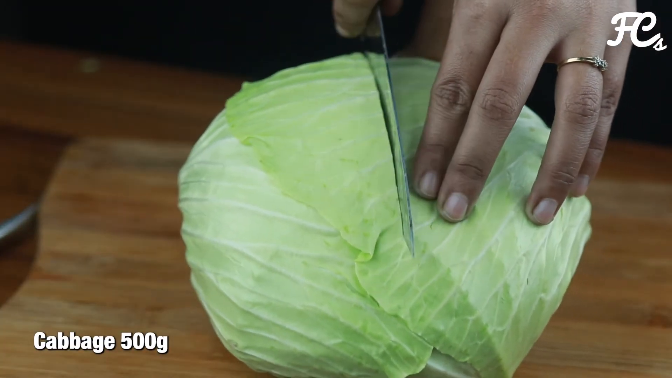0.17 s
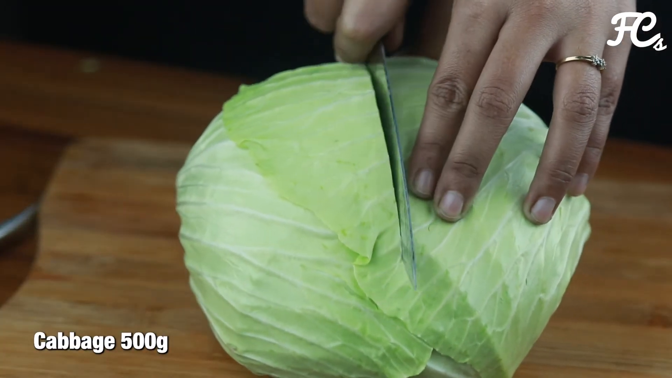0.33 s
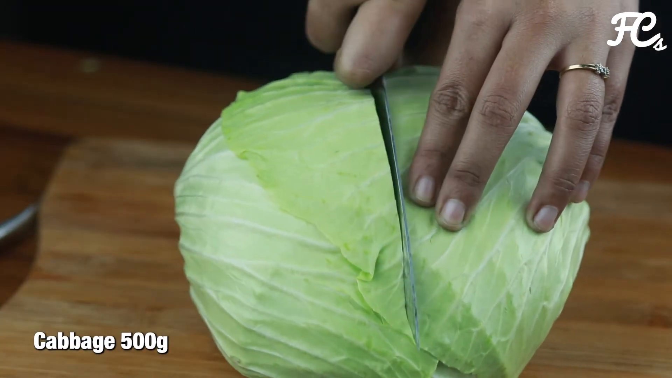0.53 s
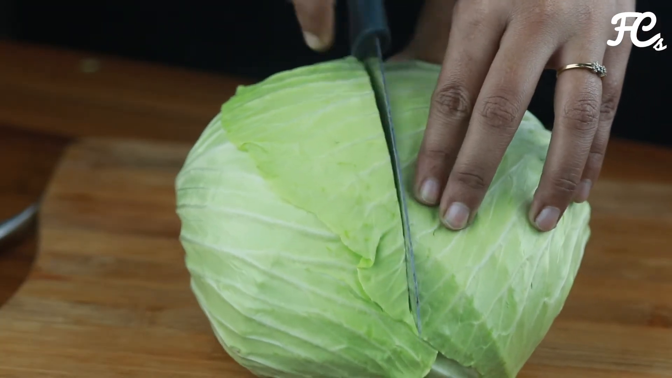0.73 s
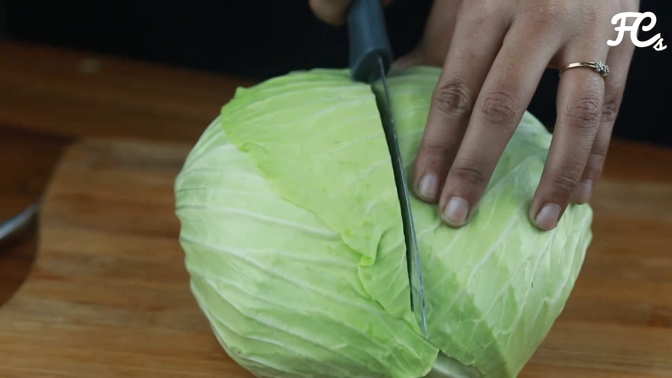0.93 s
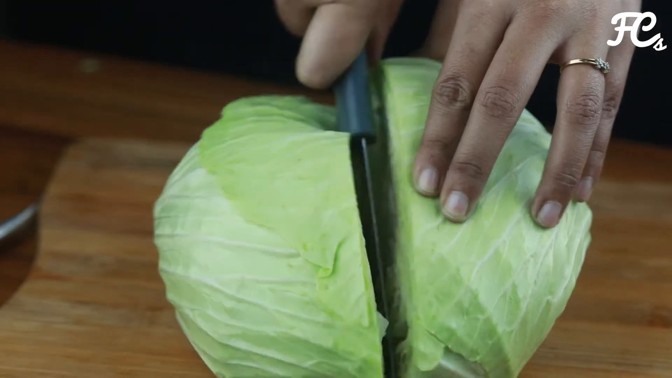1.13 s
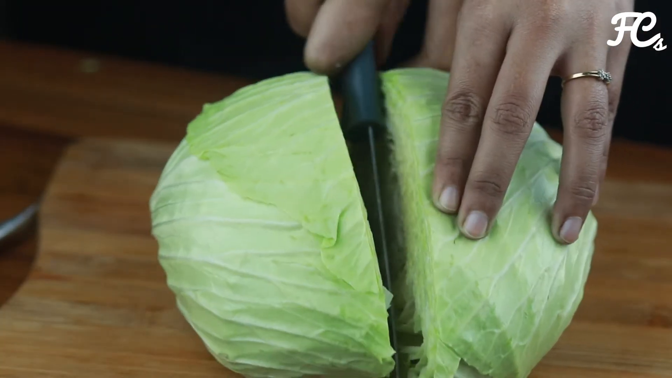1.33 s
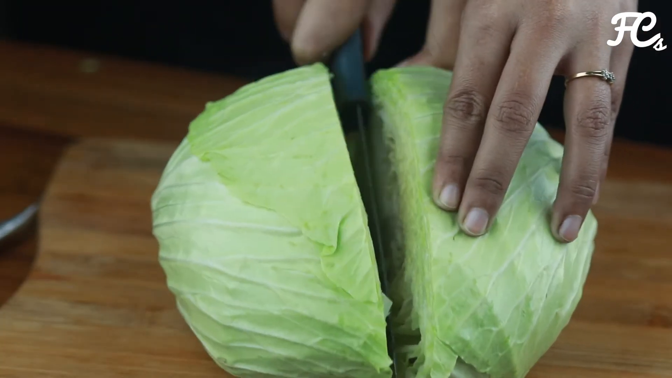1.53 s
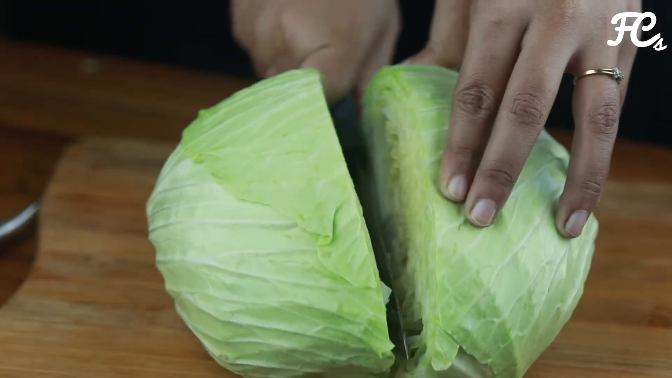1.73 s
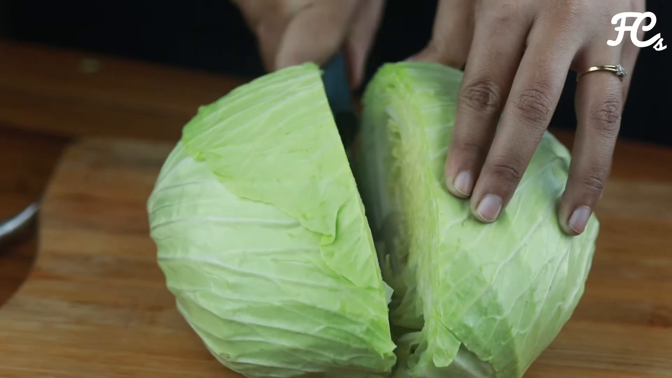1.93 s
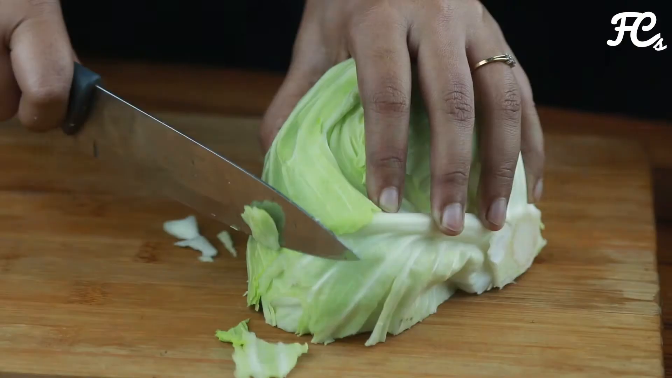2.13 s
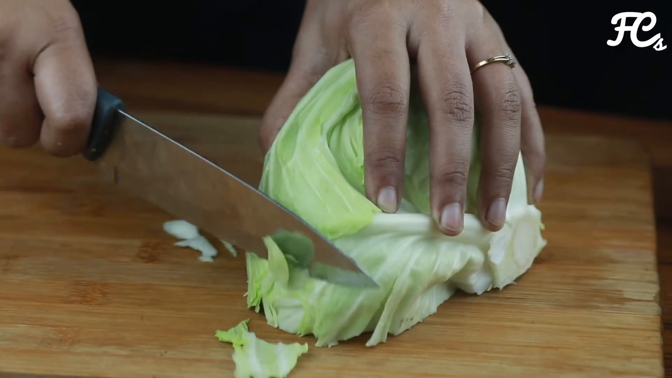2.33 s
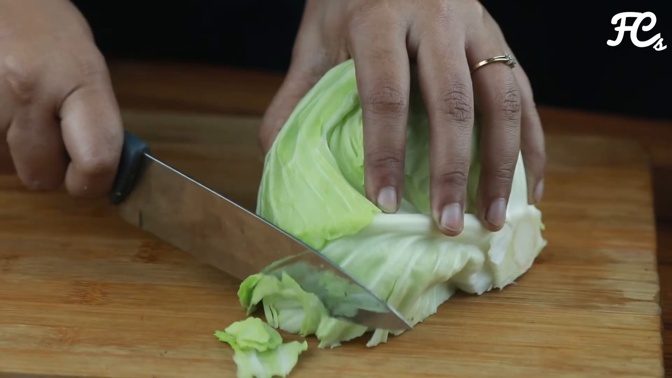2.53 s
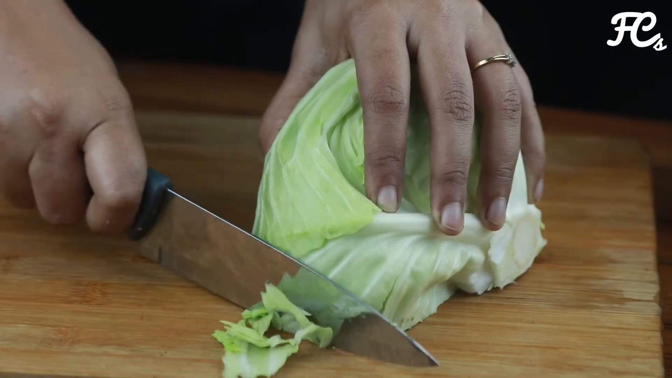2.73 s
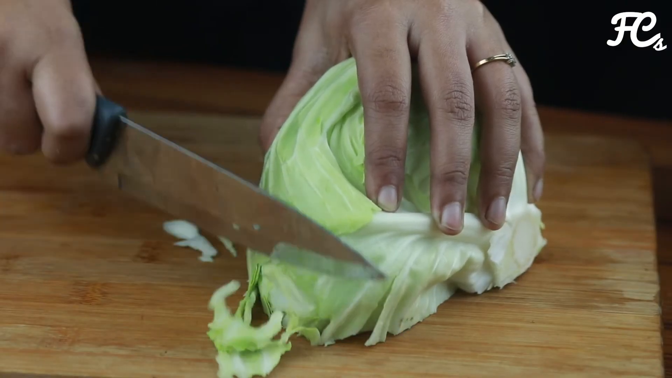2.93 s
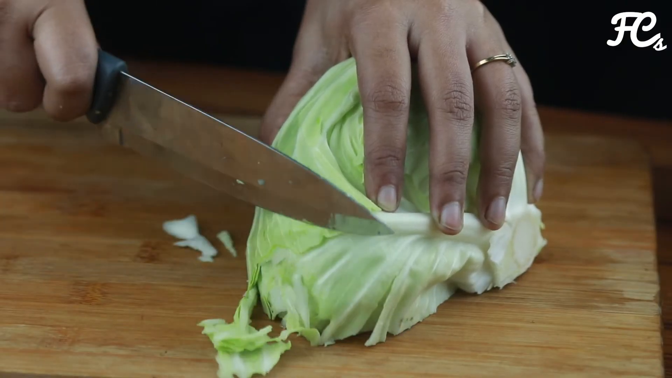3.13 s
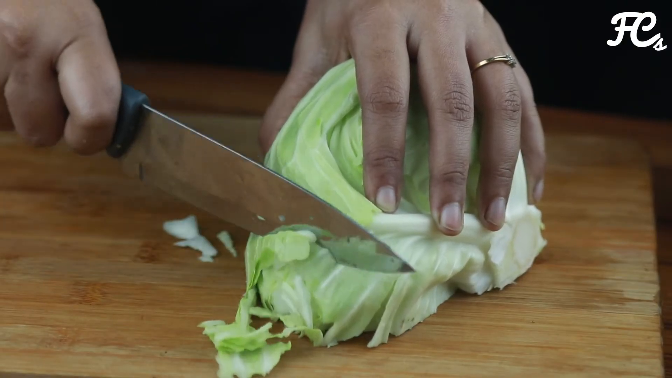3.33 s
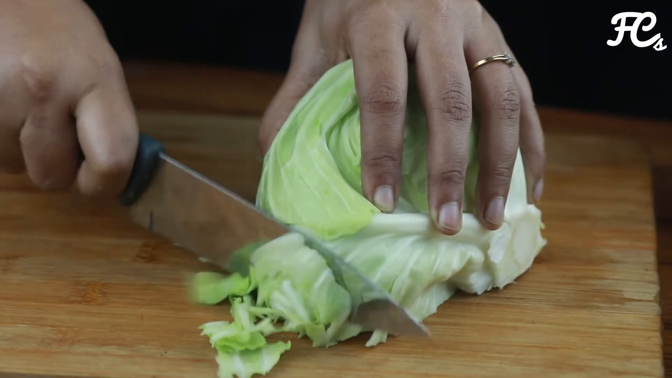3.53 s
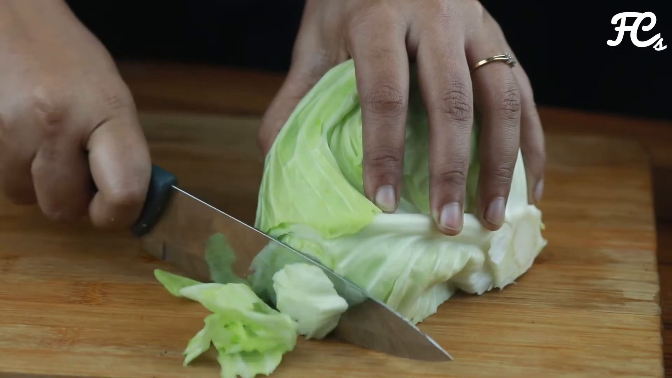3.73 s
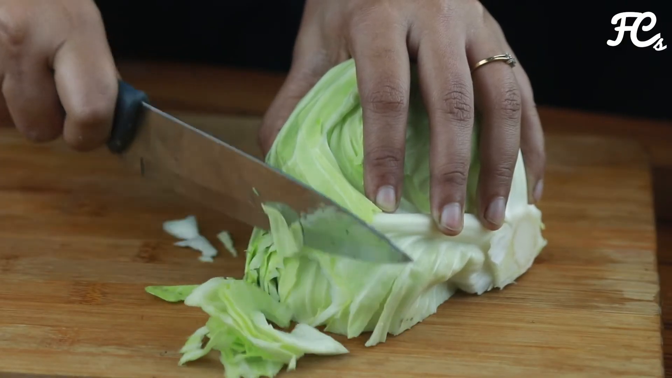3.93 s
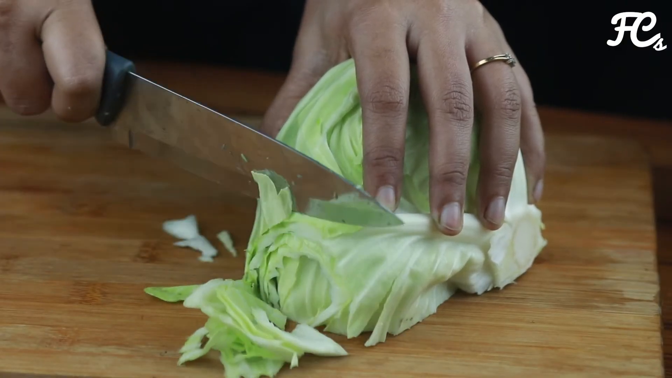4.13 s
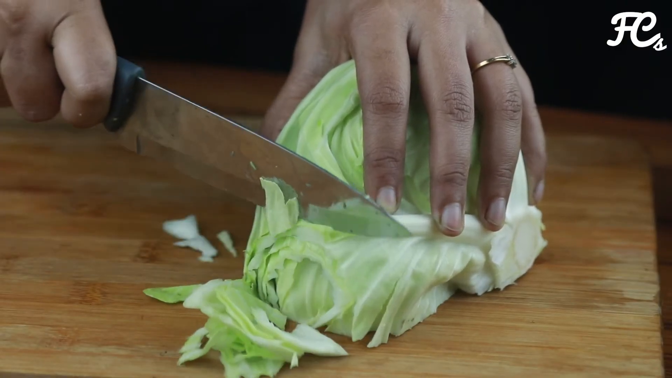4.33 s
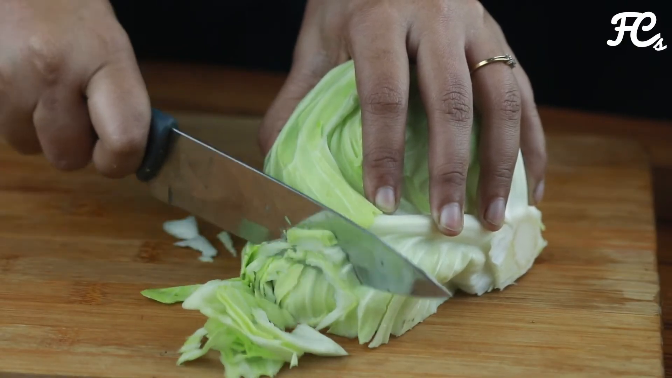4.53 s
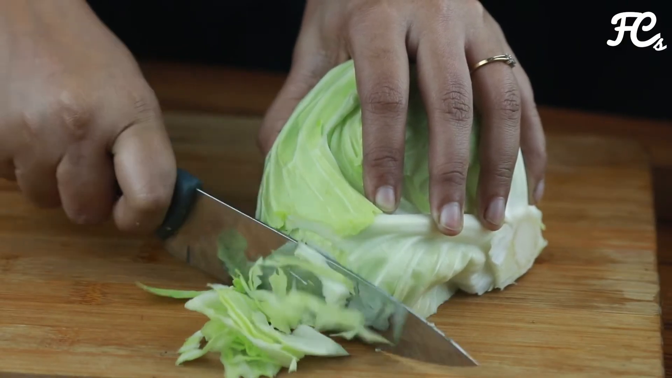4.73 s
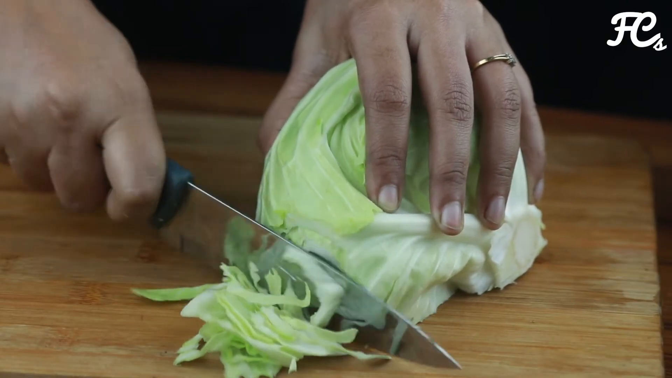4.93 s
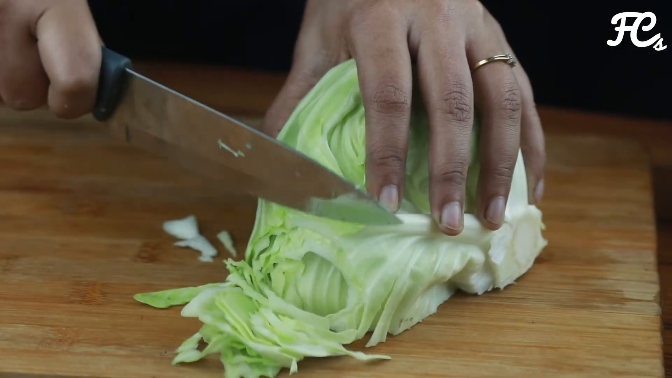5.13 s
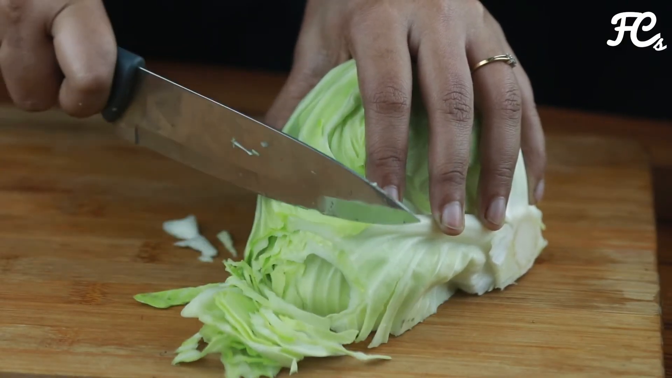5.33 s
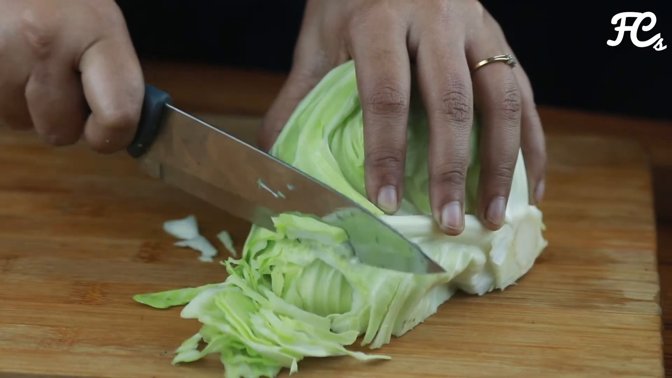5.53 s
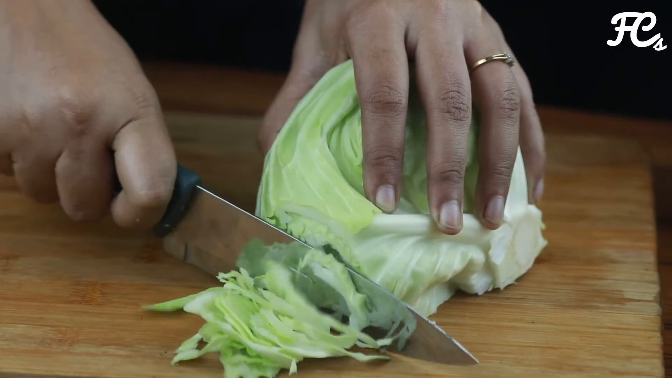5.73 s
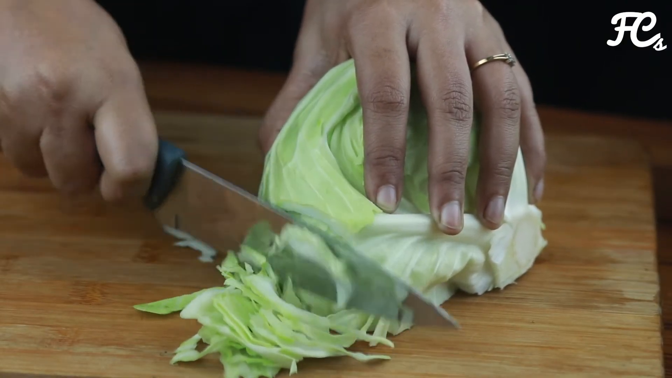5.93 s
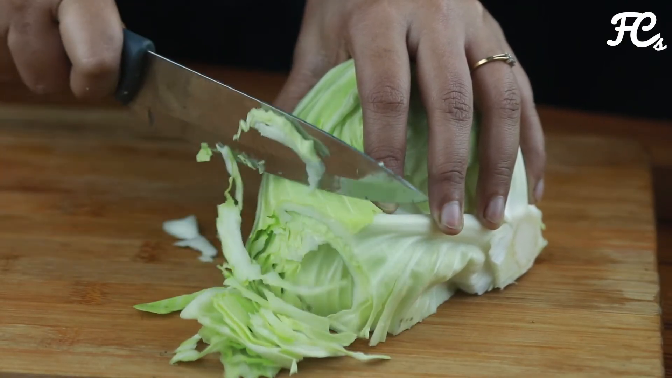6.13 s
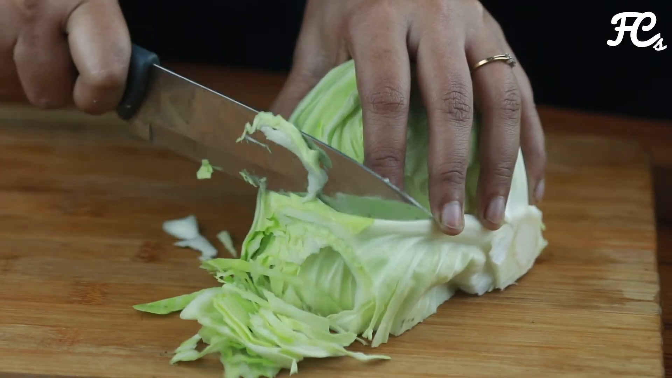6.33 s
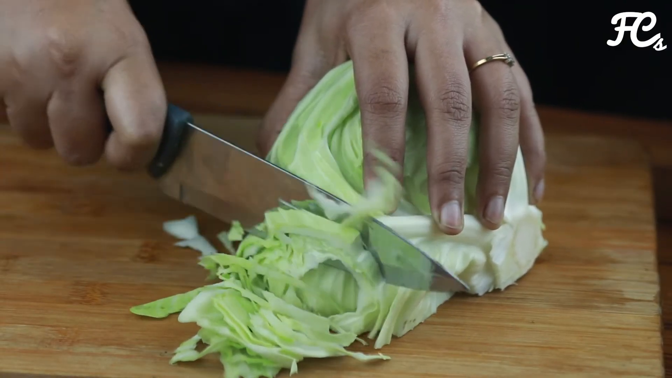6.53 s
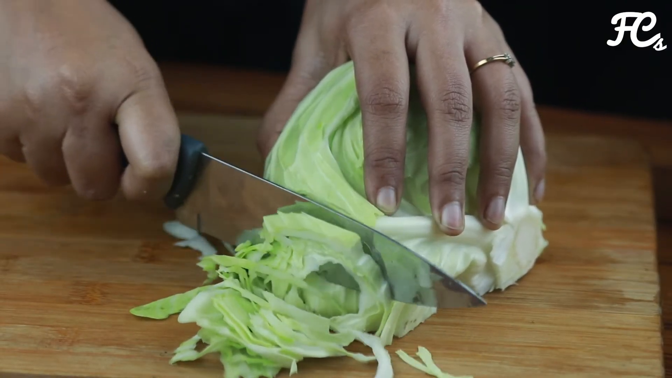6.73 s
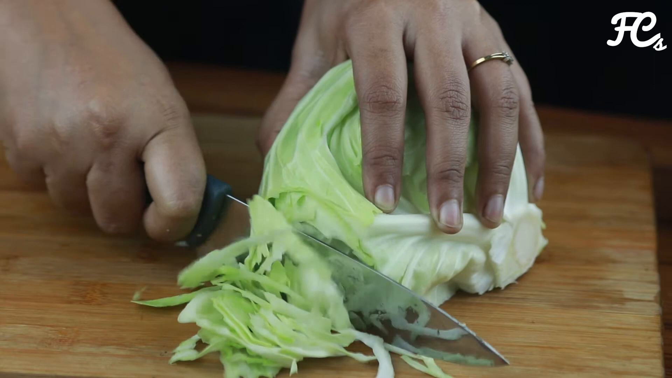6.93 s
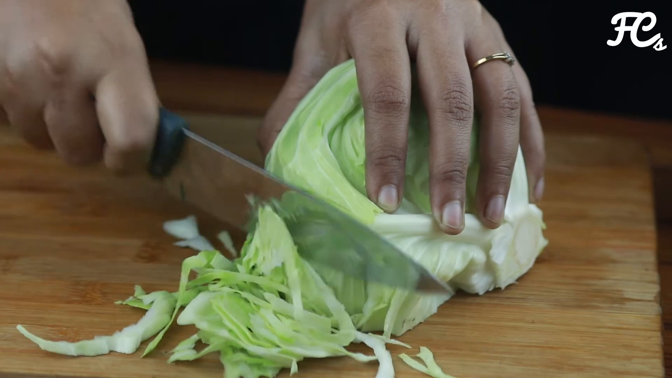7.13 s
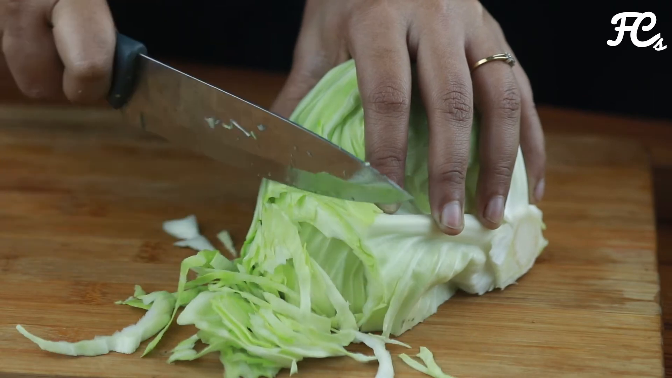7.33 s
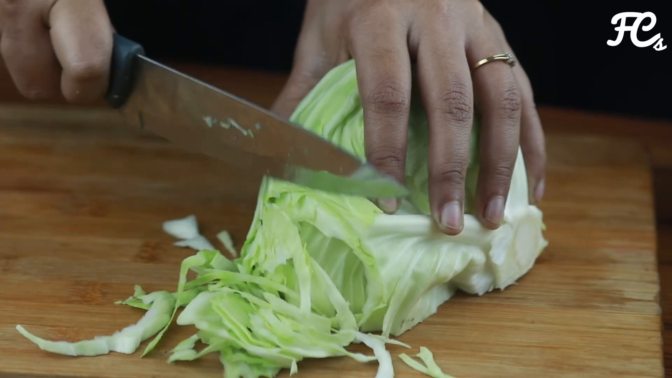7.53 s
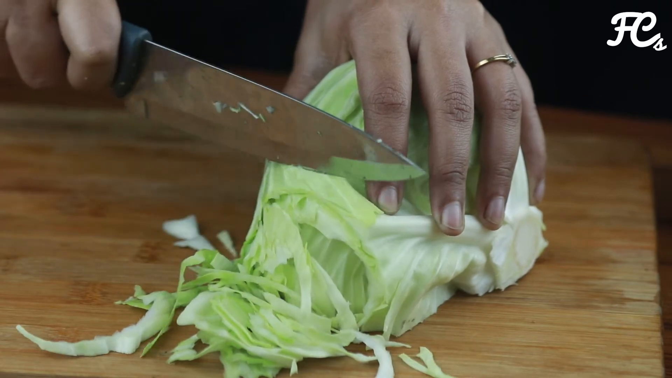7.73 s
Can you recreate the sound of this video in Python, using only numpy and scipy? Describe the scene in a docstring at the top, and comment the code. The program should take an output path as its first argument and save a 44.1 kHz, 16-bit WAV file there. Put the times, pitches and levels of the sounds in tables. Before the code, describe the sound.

A blade presses into a dense cabbage head, creaking, popping and crunching, with a light tap on wood. Then the halved head is shredded in separate crackling strokes, each a grainy tearing hiss over low thuds. Hard board knocks finish several strokes and bounce off kitchen walls. The pickup is close and detailed; the last second is nearly quiet, with small leaf ticks.

```python
"""A knife halves a cabbage, then, after a splice, shreds it stroke by stroke on a wooden board.
Random cracks ring the resonances of leaf, rib, head and board; snaps are dying bursts with a pitch.
Some strokes end in a knock that rings the board's modes, and high peaks flatten at the top.
Hard kitchen walls answer with decaying noise bands, and cut leaves settle with a faint hiss."""
import sys
import numpy as np
from scipy import signal
from scipy.io import wavfile

SR = 44100
rng = np.random.default_rng(int(sys.argv[2]) if len(sys.argv) > 2 else 0)


def log_audio(samples):
    """Write samples as a 16-bit WAV file to the path given in sys.argv[1]."""
    # one column per channel
    frames = np.atleast_2d(samples).T
    # limit to full scale, then quantise
    limited = np.clip(frames, -1, 1)
    pcm = np.round(limited * 32767).astype(np.int16)
    wavfile.write(sys.argv[1], SR, pcm)


N = 342657
SPLICE_S = 2.16  # the whole head sounds before, the shredded half after

# One list a stroke: blade pressure heard as leaf hiss. Each row: time in seconds, hiss level in dB.
STROKE_HISS = [
    [(.13, -77), (.25, -72.5), (.285, -58.5), (.345, -63), (.408, -62), (.442, -49), (.552, -62.5),
     (.562, -51), (.6, -51.5), (.63, -64), (.92, -81.5)],
    [(.94, -73.5), (.992, -57.5), (1.03, -55), (1.085, -65), (1.11, -34.5), (1.15, -32), (1.185, -49.5),
     (1.21, -38), (1.235, -54), (1.55, -78.5)],
    [(1.57, -74), (1.59, -49.5), (1.635, -58.5), (1.665, -41), (1.704, -73.5), (1.77, -61), (1.84, -75)],
    [(2.04, -90), (2.09, -61), (2.145, -72)],
    [(2.155, -68), (2.3, -56.5), (2.378, -45), (2.388, -42.5), (2.489, -50.5), (2.65, -47.5), (2.725, -34),
     (2.763, -66), (2.8, -67)],
    [(3.248, -53.5), (3.257, -41.5), (3.293, -40), (3.435, -51.5), (3.5, -59.5), (3.517, -45),
     (3.551, -31.5), (3.575, -36), (3.622, -36.5)],
    [(4.3, -74.5), (4.362, -67.5), (4.38, -49), (4.445, -40.5), (4.5, -46.5), (4.56, -40.5), (4.675, -46),
     (4.71, -36), (4.75, -41.5), (4.79, -70.5)],
    [(5.3, -82), (5.39, -57.5), (5.42, -43.5), (5.455, -54.5), (5.5, -37), (5.608, -43.5), (5.617, -35.5),
     (5.688, -41.5), (5.73, -34.5)],
    [(6.328, -63.5), (6.34, -38), (6.41, -46.5), (6.49, -44), (6.555, -32), (6.6, -44.5), (6.68, -52.5),
     (6.781, -38), (6.815, -56.5), (6.86, -31.5), (6.883, -35.5), (6.895, -30.5)],
    [(7.68, -81), (7.69, -72), (7.702, -82.5), (7.72, -67), (7.77, -80)],
]
# What each stroke cuts through. Each row: rib crunch, head and board thud, in dB
# relative to the hiss, whose swing each follows only in part.
STROKE_DEPTH = [(3.5, 9, -7.5), (11, 10.5, 1.5), (10.5, 5.5, 9), (18, -14, -20), (-2.5, -9.5, -11),
                (0, -5.5, -4.5), (0.5, -1.5, -4), (-2, -4.5, -5.5), (-1, -3, -6), (0, -24, 6.5)]
# Light touches: the blade brushes loose leaves; at 3.86 s shreds land on the board with a low thud.
# Each row: time of the peak in seconds, hiss at the peak in dB,
# then rib crunch, head and board thud in dB relative to that hiss.
LIGHT_TOUCHES = [(3.133, -57, -25.5, -27, -3.5), (3.776, -70.5, -3.5, 17.5, -1.5),
                 (3.86, -67, -3, 23.5, 17), (4.979, -59, -1, 0, -6.5), (6.232, -56.5, -3.5, -26.5, 2)]
# Resonances of tearing leaf, thick ribs and the head once halved.
# Each row: frequency in Hz, width of one pass in Hz, level in dB.
LEAF_BODY = [(5350, 2600, 0.5), (9030, 5600, -10.5), (12530, 3100, 1), (15200, 660, -6)]
RIB_BODY = [(982, 880, 4.5), (1500, 460, 7.2), (2000, 760, 6.5), (3240, 790, 6.1), (4500, 1300, 1)]
HEAD_BODY = [(161, 37, -5), (280, 130, 0), (448.4, 92, 1.5), (580, 180, -12.5)]
# The whole head's duller leaf, rib and head resonances. Each row: frequency in Hz, width in Hz, level in dB.
WHOLE_LEAF_BODY = [(4380, 6200, -9), (7560, 5600, -10), (12840, 1900, -11.5), (15000, 1100, -21)]
WHOLE_RIB_BODY = [(603, 240, 5.5), (977, 340, -2.5), (1500, 660, -1), (2200, 2300, -15.5),
                  (3760, 1900, -10)]
WHOLE_HEAD_BODY = [(168, 53, -1), (276, 75, 2), (443, 65, -0.5), (614, 260, -15.5)]
# The board's low thud under pressure. Each row: frequency in Hz, width in Hz, level in dB.
BOARD_THUD = [(51.3, 41, 2), (75, 57, -0.5), (127, 16, -7.5)]
# The long blade sings faintly through the shreds.
# Each row: frequency in Hz, width in Hz, level in dB relative to the leaf hiss.
BLADE_SONG = [(3280, 140, -16), (5930, 370, -17.5)]
# Ribs snapping and shreds dropping. Each row: start in seconds, drive level in dB,
# treble in dB relative to the drive (both before the mix gains), pitch in Hz.
RIB_SNAPS = [(0.138, -64, -11, 960), (0.22, -45, -36, 490), (0.373, -41, -3, 940), (0.423, -40, -11, 2330),
             (0.437, -34, -5, 1400), (0.472, -48, -9, 2300), (0.538, -43.5, -4, 2200),
             (0.56, -28, -13, 1000), (0.806, -65, 1, 2500), (0.992, -44.5, -16, 1900),
             (1.019, -45, -15, 2000), (1.032, -36.5, -11, 1960), (1.051, -37, -11.5, 1880),
             (1.204, -17.5, -9, 890), (1.264, -39, -5, 2400), (1.302, -40, -3, 2200),
             (1.332, -44, -5, 1460), (1.389, -37.5, -24, 1800), (1.409, -38.5, -4, 2200),
             (1.477, -48.5, -13, 2000), (1.646, -29.5, -9, 2770), (1.668, -41, -16, 700),
             (1.76, -55, 7, 1400), (1.777, -36, -2.5, 1400), (2.09, -27.5, -17.5, 1030),
             (2.116, -36, -13, 1000), (2.231, -63, -7, 5500), (2.387, -29.5, -14, 2100),
             (2.576, -34.5, -16, 2200), (2.613, -49, 4, 2000), (2.657, -37, -1, 1500),
             (2.877, -41.5, -11, 1334), (3.26, -32, -9.5, 2330), (3.275, -26, -10.5, 3280),
             (3.297, -20.5, -18, 3000), (3.325, -27.5, -11.5, 3280), (3.341, -22.5, -9.5, 3640),
             (3.417, -38, 0.5, 1600), (3.519, -31, -5.5, 4204), (3.535, -36.5, -3, 1240),
             (3.772, -29.5, -6, 3060), (3.795, -66, 5, 6000), (3.805, -34.5, -9.5, 3000),
             (3.82, -51, 0.5, 2200), (3.847, -39.5, -10.5, 968), (4.371, -54.5, 14, 1750),
             (4.377, -48.5, 18, 1750), (4.452, -30.5, 2, 1830), (4.483, -33, 5.5, 2500),
             (5.392, -37, 4.5, 3080), (5.478, -31.5, -8, 4730), (5.615, -26, -3.5, 1880),
             (5.534, -26, -12, 3000), (5.547, -31, -9.5, 3050), (5.663, -29.5, -3.5, 3800),
             (5.701, -37.5, -5.5, 3330), (6.338, -44.5, 5, 1375), (6.395, -32, -0.5, 2000),
             (6.425, -39.5, 4.5, 860), (6.447, -39.5, 5, 1240), (6.51, -32.5, 8, 1860),
             (6.6, -32.5, 1.5, 2250), (6.665, -35, -1.5, 2180), (6.693, -36.5, 1.5, 2500),
             (6.707, -26.5, -13.5, 2110), (6.725, -29, -3.5, 2490), (6.828, -34, 1, 2200),
             (6.852, -20, -7, 3620), (7.068, -36.5, -16, 175), (7.29, -52, 0, 2480),
             (7.435, -81, 11.5, 5000), (7.446, -52, -10, 2700), (7.58, -40, -14, 1500),
             (7.591, -41.5, -12, 1300)]
# The head jolts on the board as a thick layer gives way. Each row: start in seconds, peak level in dB.
HEAD_JOLTS = [(0.438, -34), (0.561, -42), (1.105, -27), (2.386, -40), (2.447, -41), (3.303, -41.5),
              (3.381, -42.5), (4.451, -32), (4.567, -42), (5.613, -38.5), (6.425, -35.5), (6.529, -32),
              (6.705, -34.5)]
# Blade on board. Each row: start in seconds, drive level in dB before trim, low-pass corner in Hz,
# strength towards the walls in dB before gain.
BLADE_KNOCKS = [(1.1739, -20, 3500, -29.5), (1.852, -31.5, 5000, -23), (3.635, -7.5, 2570, -4.5),
                (5.7438, 2, 7000, 5), (6.9086, -6, 2930, -4)]
# Board modes. Each row: frequency in Hz, level in dB before a random unevenness, 60 dB decay in seconds.
BOARD_MODES = [(160, -20, 0.095), (338, -23, 0.022), (450, -12, 0.053), (632, -22, 0.18), (985, 1.5, 0.032),
               (1300, -10, 0.11), (1445, 13.5, 0.015), (1830, 8.5, .014), (2033, 3, 0.03),
               (2942, 8.5, 0.012), (3400, -15.5, .01), (3800, -1, 0.013), (4450, -4, 0.0054),
               (4721, -9.5, 0.023), (6940, -17, .006)]
# The board's blow as the walls receive it. Each row: frequency in Hz, width in Hz, level in dB.
WALL_PULSE = [(167, 180, -9.5), (387, 300, -5), (1030, 1200, -10.5), (1840, 860, 3.5), (3700, 2000, -8),
              (7000, 2600, -18.5)]
# Kitchen echo. Each row: frequency in Hz, level in dB before the echo gain, 60 dB decay in seconds.
KITCHEN_BANDS = [(62.4, -19.5, 1.0), (156, -3, 0.93), (257, -16, 0.6), (420, -17.5, 0.84), (686, -14, 0.86),
                 (1180, -20, 0.76), (2000, -23.5, 0.68), (2850, -22.5, 0.55), (5000, -25.5, 0.59),
                 (8700, -6, 0.14), (14000, -17, 0.16)]

# Cracks: mean rate before clumping, spread of sizes, swings of the fast and slow clumping
CRACKS_PER_S, CRACK_SPREAD_DB, CLUMP_DB, TEAR_DB = 6000, 3.5, 2.5, 2
SHARED = 0.46  # share of a crack heard by the resonances of pieces that are not tearing
# Outer leaves come first: rib, head and board start short by BITE_DB and catch up over BITE_S
BITE_DB, BITE_S = (5.5, 9.5, 9.5), 0.2
# Share of the hiss's swing about MEAN_HISS_DB that rib, head and board follow
FOLLOWS, MEAN_HISS_DB = (0.92, 0.92, 0.83), -37.5
TOUCH_RISE_DB_PER_S, TOUCH_FALL_DB_PER_S = 413, 299.5
# Snap decay at a drive of -30 dB; width of a snap's lowest resonance as a share of its pitch
SNAP_T60_S, LOW_WIDTH = 0.018, 0.16
# Dull snaps among the shreds fainter than this swell in softly instead of breaking
FAINT_DB, SWELL_S = -41, 0.004
JOLT_T60_S, JOLT_HEAD_DB = 0.033, -4  # head against board
# Settling fed by strokes and by blows, and its decay for whole head and shreds
SETTLE_DB, SHAKEN_DB, SETTLE_T60_S = -24.5, -61.5, (6, 1.9)
OVERLOAD, CUTOFF_HZ = 0.59, 16600  # ceiling as a sample value; treble 60 dB down from the cutoff up


def amp(db):
    """Decibels to gain."""
    return 10 ** (np.asarray(db) / 20)


def rms_one(x):
    """Scale to unit power."""
    return x / np.sqrt(np.mean(x ** 2) + 1e-20)


def drift(rate_hz):
    """Slow random swing of unit power: noise smoothed twice at rate_hz."""
    r = np.exp(-2 * np.pi * rate_hz / SR)
    noise = rng.standard_normal(N + SR)
    return rms_one(signal.lfilter([1], [1, -2 * r, r * r], noise)[SR:])


def before_splice():
    """True while the whole head sounds."""
    return np.arange(N) < SPLICE_S * SR


def resonate(x, peaks):
    """Parallel resonances of alternating sign, each applied twice to keep the valleys dark."""
    out = 0
    for k, (hz, width_hz, level_db) in enumerate(peaks):
        r = np.exp(-np.pi * width_hz / SR)
        top = [(1 - r * r) / 2, 0, (r * r - 1) / 2]
        bottom = [1, -2 * r * np.cos(2 * np.pi * hz / SR), r * r]
        ringing = signal.lfilter(top, bottom, signal.lfilter(top, bottom, x))
        out = out + (-1) ** k * amp(level_db) * ringing
    return out


def stroke_levels():
    """Gains of leaf, rib, head and board: pressure sets the hiss, and the deeper parts partly follow."""
    t, gains = np.arange(N) / SR, np.zeros((4, N))
    for rows, depth_db in zip(STROKE_HISS, STROKE_DEPTH):
        s, points_db = np.transpose(rows)
        fade = np.clip(np.minimum(t - s[0], s[-1] + 0.016 - t) / 0.004, 0, 1)
        hiss_db = np.interp(t, s, points_db)
        shallow = np.clip(1 - (t - s[1]) / BITE_S, 0, 1)
        levels_db = [hiss_db]
        for share, depth, bite in zip(FOLLOWS, depth_db, BITE_DB):
            followed_db = MEAN_HISS_DB + share * (hiss_db - MEAN_HISS_DB)
            levels_db.append(followed_db + depth - bite * shallow)
        gains += fade * amp(levels_db)
    for s, hiss_db, *deep_db in LIGHT_TOUCHES:
        slope_db = np.minimum(TOUCH_RISE_DB_PER_S * (t - s), TOUCH_FALL_DB_PER_S * (s - t))
        gains += amp(hiss_db + slope_db) * amp([0] + deep_db)[:, None]
    return gains


def tear(cracks, dealt, body):
    """Cracks ring one body, each moment favouring the piece that is tearing."""
    turn = (dealt * len(body)).astype(int)
    total = 0
    for k, peak in enumerate(body):
        heard = cracks * np.where(turn == k, 1, SHARED)
        total = total + (-1) ** k * resonate(heard, [peak])
    return rms_one(total)


def slicing():
    """Cell walls burst in clumps; the same cracks drive leaf, rib, head and board."""
    clumps = amp(CLUMP_DB * drift(60) + TEAR_DB * drift(25))
    born = rng.random(N) < CRACKS_PER_S * clumps / SR
    sizes = amp(CRACK_SPREAD_DB * np.minimum(rng.exponential(1, N), 5)) * rng.choice([-1, 1], N)
    cracks = born * sizes + 1e-18
    # the tearing piece is drawn anew every 150 samples (3.4 ms)
    dealt = np.repeat(rng.random(N // 150 + 1), 150)[:N]
    blade = 0
    for hz, width_hz, level_db in BLADE_SONG:
        blade = blade + amp(level_db) * rms_one(resonate(cracks, [(hz, width_hz, 0)]))
    whole = before_splice()
    leaf = np.where(whole, tear(cracks, dealt, WHOLE_LEAF_BODY), tear(cracks, dealt, LEAF_BODY) + blade)
    rib = np.where(whole, tear(cracks, dealt, WHOLE_RIB_BODY), tear(cracks, dealt, RIB_BODY))
    head = np.where(whole, tear(cracks, dealt, WHOLE_HEAD_BODY), tear(cracks, dealt, HEAD_BODY))
    thud = tear(cracks, dealt, BOARD_THUD)
    return np.sum(stroke_levels() * [leaf, rib, head, thud], axis=0)


def snaps():
    """Each snap is a break and a dying burst of noise; the piece that breaks sets its pitch."""
    dull, bright, t = np.zeros(N), np.zeros(N), np.arange(round(0.15 * SR)) / SR
    noise = rng.standard_normal((len(RIB_SNAPS), len(t)))
    noise[:, 0] = 9  # the break itself
    for (s, drive_db, treble_db, hz), burst in zip(RIB_SNAPS, noise):
        at = round(s * SR)
        t60 = SNAP_T60_S * amp(-0.3 * (drive_db + 30))  # faint ones are longer, softer rustles
        soft = s > SPLICE_S and drive_db < FAINT_DB and treble_db < 0
        swell = np.minimum(t / SWELL_S, 1) if soft else 1
        burst = (amp(drive_db - 60 * t / t60) * swell * burst)[:N - at]
        piece = resonate(burst, [
            (hz, 0.39 * hz, 0),
            (1.6 * hz, 0.48 * hz, -5),
            (min(3.3 * hz, 9000), 1.6 * hz, -13),
            (0.56 * hz, LOW_WIDTH * hz, -3)])
        dull[at:at + len(burst)] += piece * np.sqrt(3000 / hz)  # lifts low, narrow pieces
        bright[at:at + len(burst)] += amp(treble_db) * burst
    return amp(4.5) * dull + amp(2.0) * resonate(bright + 1e-18, LEAF_BODY)


def jolts():
    """A short dying shove sets board and head sounding together."""
    out, t = np.zeros(N), np.arange(round(0.2 * SR)) / SR
    shoves = rng.standard_normal((len(HEAD_JOLTS), len(t))) * amp(-60 * t / JOLT_T60_S)
    for (s, peak_db), shove in zip(HEAD_JOLTS, shoves):
        thump = resonate(shove, BOARD_THUD) + amp(JOLT_HEAD_DB) * resonate(shove, HEAD_BODY)
        out[round(s * SR):][:len(t)] += amp(peak_db) * thump / np.abs(thump).max()
    return out


def knocks():
    """A blow strikes every board mode; the walls, hearing the board from all sides, get a smooth pulse."""
    near, far, t = np.zeros(N), np.zeros(N), np.arange(round(0.3 * SR)) / SR
    uneven_db = rng.normal(0, 1.5, (len(BLADE_KNOCKS), len(BOARD_MODES)))
    pulse = resonate(1.0 * (t == 0), WALL_PULSE)
    for (s, drive_db, sharp_hz, far_db), uneven in zip(BLADE_KNOCKS, uneven_db):
        ring = 0
        for (hz, level_db, t60), offset_db in zip(BOARD_MODES, uneven):
            ring = ring + amp(level_db + offset_db - 60 * t / t60) * np.sin(2 * np.pi * hz * t)
        edge_crack = amp(9.5) * rng.standard_normal(len(t)) * amp(-60 * t / 0.028)
        soften = signal.butter(2, min(sharp_hz, 15000), fs=SR, output="sos")
        at = round(s * SR)
        near[at:at + len(t)] += amp(drive_db - 7.5) * signal.sosfilt(soften, ring + edge_crack)
        far[at:at + len(t)] += amp(far_db + 33) * signal.sosfilt(soften, pulse)
    return near, far


def kitchen_echo():
    """Dense wall echoes: third-octave noise bands that each die at their own rate."""
    t, edges = np.arange(round(1.3 * SR)) / SR, 40 * 2 ** (np.arange(27) / 3)
    hz, level_db, t60 = np.transpose(KITCHEN_BANDS)
    white, tail = rng.standard_normal((2, len(t))), 0
    for k, (low, high) in enumerate(zip(edges, edges[1:])):
        centre = np.log(low * high) / 2
        life = max(np.interp(centre, np.log(hz), t60), 0.05)
        band_pass = signal.butter(2, [low, high], "band", fs=SR, output="sos")
        band = signal.sosfilt(band_pass, white[k % 2])
        decay = amp(np.interp(centre, np.log(hz), level_db) - 60 * t / life)
        tail = tail + band * decay / np.sqrt(life * SR / 14)  # long decays gain no extra energy
    return tail * np.clip((t - 0.004) / 0.0014, 0, 1)  # the first walls answer after 4 ms


def settling():
    """A faint patchy hiss of leaves relaxing: strokes and blows feed a power that slowly dies."""
    stirred = (amp(SETTLE_DB) * stroke_levels()[0]) ** 2 * 10 / SR
    for s, _, _, far_db in BLADE_KNOCKS:
        stirred[round(s * SR)] += amp(SHAKEN_DB + far_db) ** 2
    whole, power = before_splice(), 0
    for part, t60 in zip((whole, ~whole), SETTLE_T60_S):
        keep = amp(-120 / (t60 * SR))  # power, not amplitude: 60 dB down after t60
        power = power + part * signal.lfilter([1], [1, -keep], stirred * part + 1e-18)
    hiss = rms_one(resonate(rng.standard_normal(N), RIB_BODY[2:] + LEAF_BODY))
    return hiss * np.sqrt(power) * amp(1.5 * drift(25))


def scene():
    """Knife, cabbage and board close by, the kitchen around them; the splice cuts the first echo short."""
    cabbage = slicing() + snaps() + jolts()
    near, far = knocks()
    whole, tail = before_splice(), kitchen_echo()
    sent = cabbage + far
    first_echo = whole * signal.fftconvolve(sent * whole, tail)[:N]
    second_echo = signal.fftconvolve(sent * ~whole, tail)[:N]
    return (cabbage + near + amp(4.5) * (first_echo + second_echo) + settling())[None]


def record(dry):
    """High peaks flatten smoothly at the ceiling; the deepest bass and the top treble are cut."""
    flat = dry / (1 + np.abs(dry / OVERLOAD) ** 6) ** (1 / 6)
    thin = signal.sosfilt(signal.butter(2, 48, "high", fs=SR, output="sos"), flat)
    return signal.sosfilt(signal.cheby2(20, 60, CUTOFF_HZ, fs=SR, output="sos"), thin)


dry = scene()
out = record(dry)
log_audio(out)
```